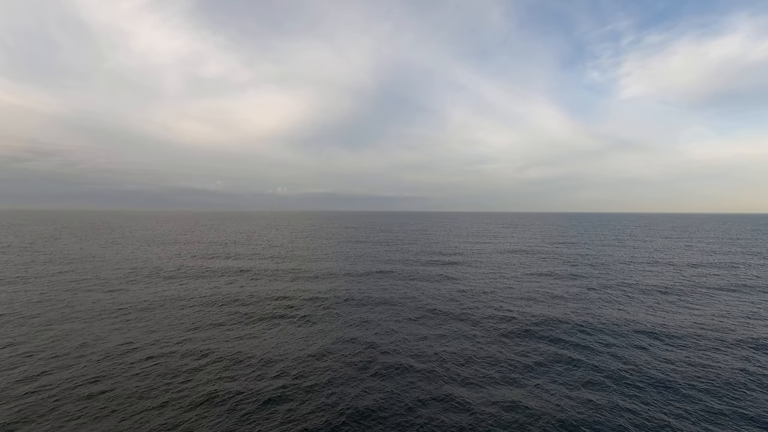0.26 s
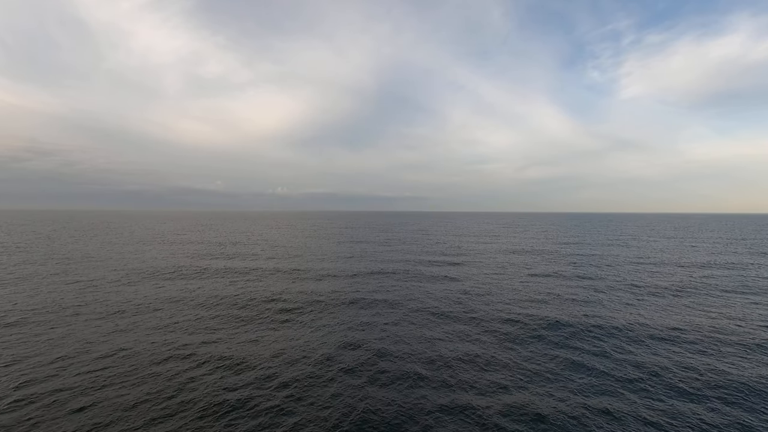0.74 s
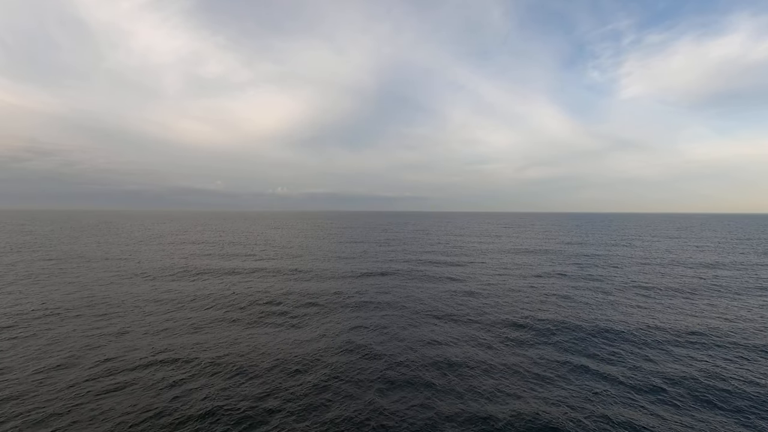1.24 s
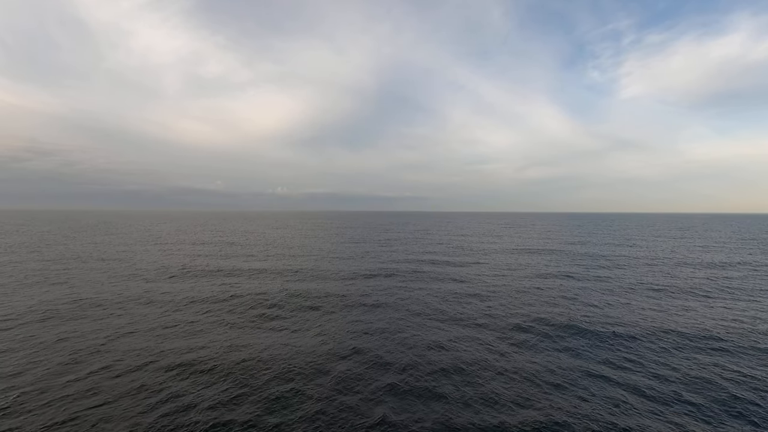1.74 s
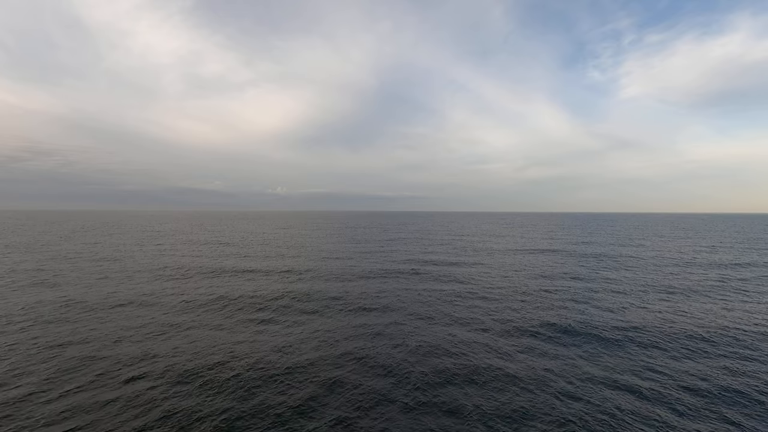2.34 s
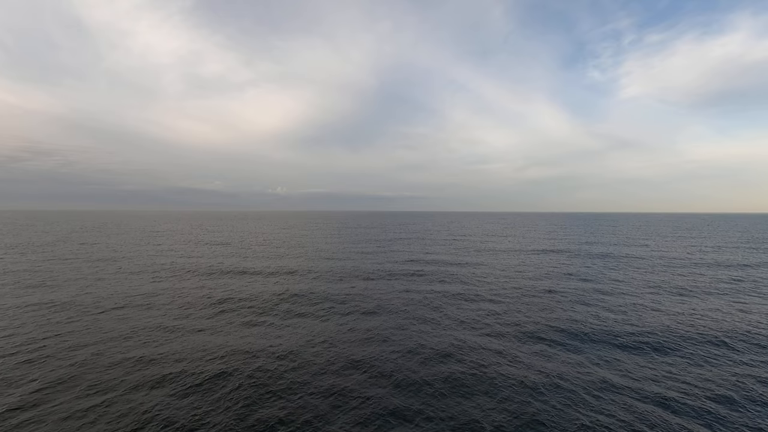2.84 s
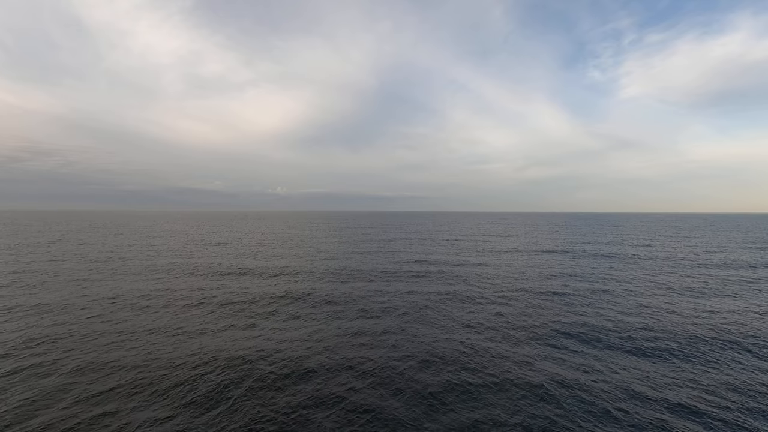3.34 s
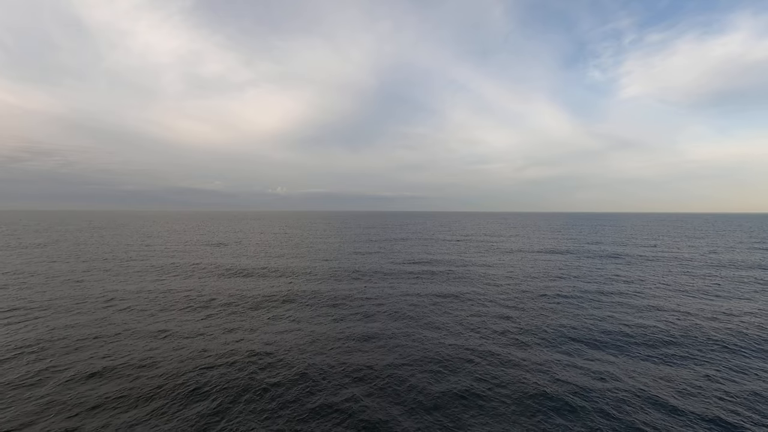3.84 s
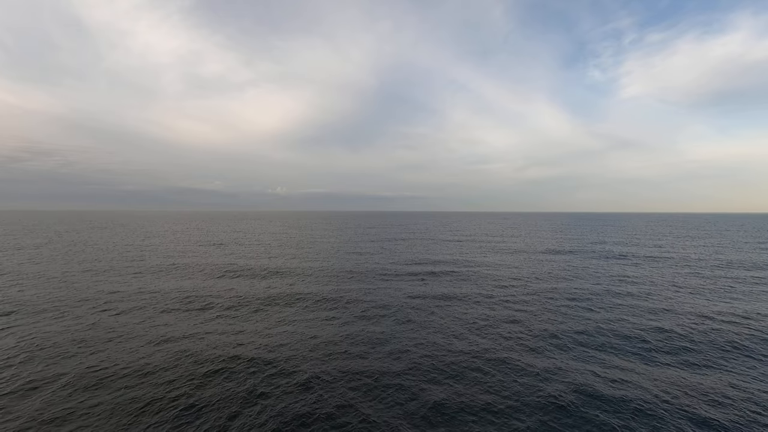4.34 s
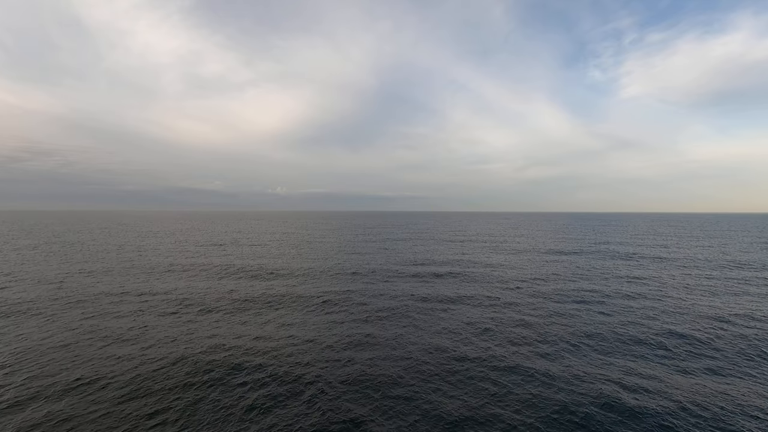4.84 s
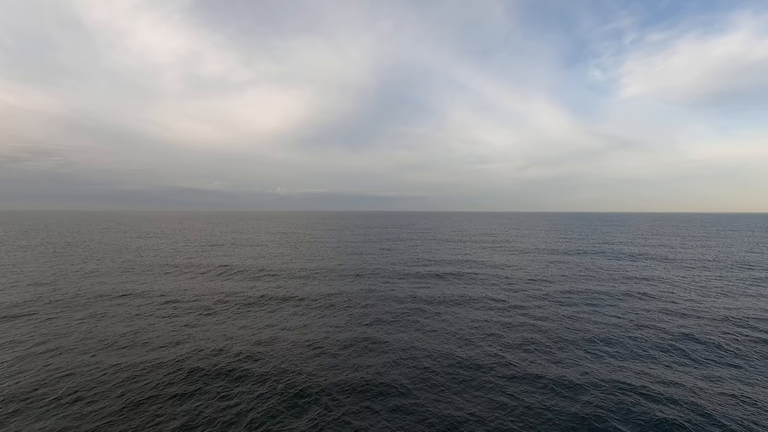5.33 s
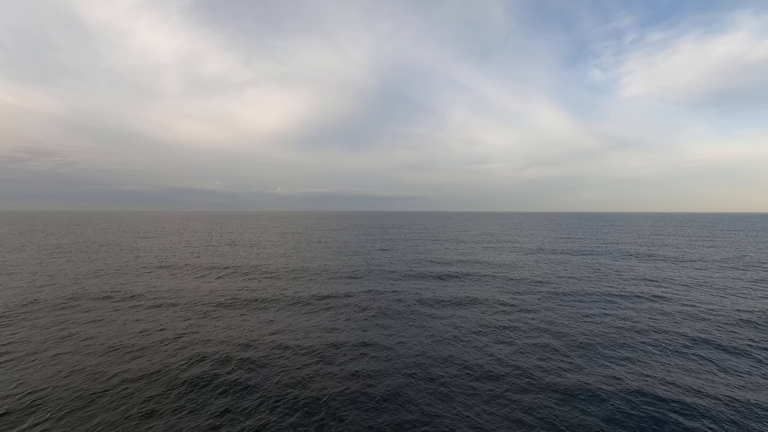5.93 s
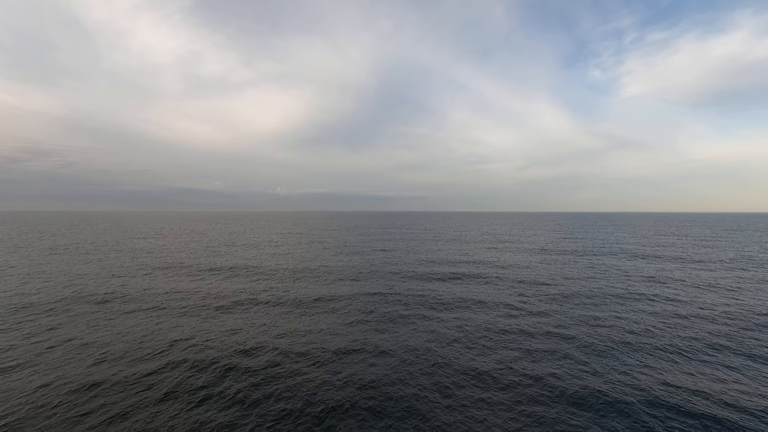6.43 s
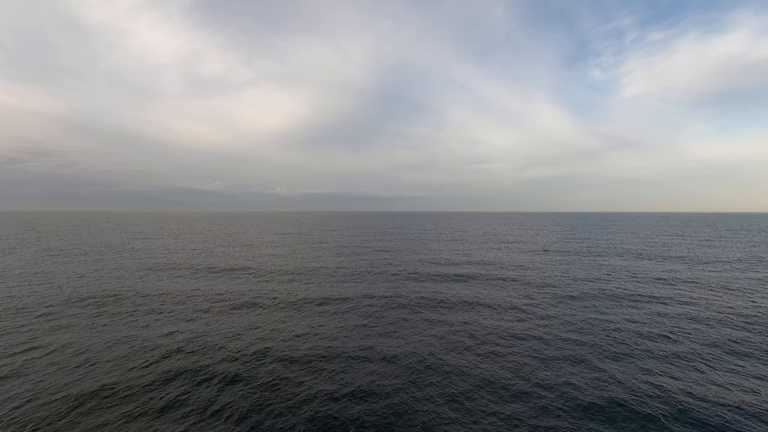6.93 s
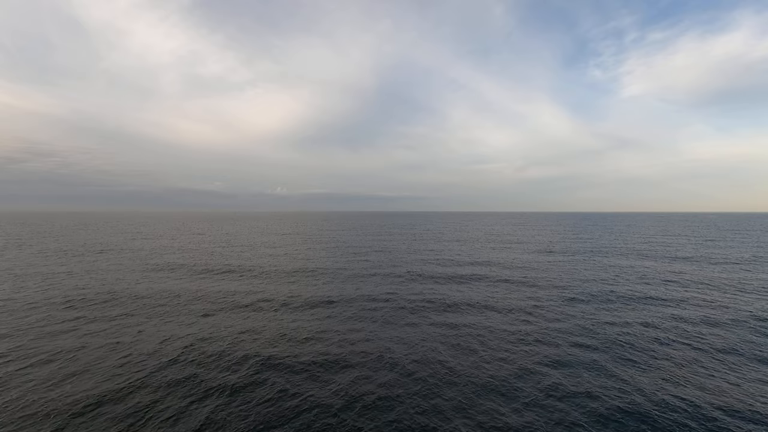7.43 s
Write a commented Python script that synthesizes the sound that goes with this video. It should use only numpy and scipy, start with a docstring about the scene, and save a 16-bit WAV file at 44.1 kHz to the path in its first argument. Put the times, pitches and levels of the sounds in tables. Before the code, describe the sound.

A constant low rush of wind hits an exposed microphone at sea, fluttering and rasping from the start. Single deep thumps land here and there, and after a second or so brief gusts add hollow roars. The wash of waves against the ship stays much quieter, a soft foamy hiss rising and falling behind the wind.

```python
"""Open sea from the deck of a moving ship, steady wind on the microphone.
Throughout, large eddies rumble on the housing, smaller ones buffet it and the flow rasps at the port;
beneath the wind, the wash along the hull swells and sinks. From the first moments flurries flap and
tear at the port and single eddies thump the housing. From 1.4 s short gusts add hollow roars.
A limiter holds the peaks."""
import sys
import numpy as np
from scipy import signal
from scipy.fft import rfft, irfft, next_fast_len
from scipy.io import wavfile
from scipy.ndimage import uniform_filter1d, minimum_filter1d

SR = 44100
rng = np.random.default_rng(int(sys.argv[2]) if len(sys.argv) > 2 else 0)


def transcribe(signal):
    """Save signal, clipped to [-1, 1], as a 16-bit WAV file at the path in sys.argv[1]."""
    frames = np.atleast_2d(signal).T
    limited = np.clip(frames, -1, 1)
    pcm = np.round(limited * 32767).astype(np.int16)
    wavfile.write(sys.argv[1], SR, pcm)


N = 338584
TIME = np.arange(N) / SR


def from_db(db):
    """Decibels to gain."""
    return 10 ** (np.asarray(db) / 20)


def unit_rms(x):
    """Scale to rms 1."""
    return x / np.sqrt(np.mean(x ** 2) + 1e-20)


def curve(rows):
    """(t/s, value) rows, joined linearly at each sample."""
    return np.interp(TIME, *np.transpose(rows))


def drift(corner_hz):
    """Slow random signal, rms about 1: noise through two one-pole low-passes."""
    hop, run_in = 40, 2000
    pole = np.exp(-2 * np.pi * corner_hz * hop / SR)
    white = rng.standard_normal(N // hop + run_in + 2)
    slow = signal.lfilter([1], [1, -2 * pole, pole * pole], white)[run_in:]
    return np.interp(np.arange(N) / hop, np.arange(len(slow)), unit_rms(slow))


def coloured_noise(spectrum):
    """Noise shaped by (f/Hz, level/dB) rows; rms 1."""
    size = next_fast_len(N)
    f_hz, level_db = np.transpose(spectrum)
    bins_hz = np.maximum(np.arange(size // 2 + 1) * SR / size, 1)
    gain = from_db(np.interp(np.log(bins_hz), np.log(f_hz), level_db))
    gain *= np.minimum(bins_hz / f_hz[0], 1) * np.minimum(f_hz[-1] / bins_hz, 1) ** 2   # end roll-offs
    return unit_rms(irfft(gain * rfft(rng.standard_normal(size)), size)[:N])


def grainy_noise(spectrum, grain_db):
    """Coloured noise broken into millisecond grains; rms 1."""
    return unit_rms(coloured_noise(spectrum) * from_db(grain_db * np.tanh(drift(250))))


def steady(x, span_s):
    """Divide by the running rms: fast lumps stay, slow swells go."""
    power = uniform_filter1d(x ** 2, max(int(span_s * SR), 2))
    return x / np.sqrt(np.maximum(power, 1e-12))


def puff(t_s, peak_db, sigma_s):
    """Gaussian pressure envelope of one passing eddy."""
    return from_db(peak_db) * np.exp(-0.5 * ((TIME - t_s) / sigma_s) ** 2)


def rumble(trim_db, lumpy_db):
    """Large eddies press slowly on the housing."""
    # eddy pressure: t/s, level/dB before trim
    pressure = [(0, -21), (0.3, -19.5), (0.6, -21.5), (1.3, -21), (2.5, -23), (3.05, -20), (4.25, -21.5),
                (4.6, -21), (5.25, -21.5), (6.25, -20), (6.65, -20), (7.68, -22)]
    # rumble spectrum: f/Hz, level/dB
    spectrum = [(10, -7.5), (22, 1), (45, 0), (58, -0.5), (75, -4.5), (118, -8), (160, -13), (260, -30.5),
                (600, -66)]
    noise = coloured_noise(spectrum) * from_db(lumpy_db * drift(4.4))
    return from_db(curve(pressure) + trim_db) * steady(noise, span_s=0.11)


def buffeting(eddies, trim_db, lumpy_db, hollow_db):
    """Smaller eddies beat on the housing; the harder the push, the hollower the sound."""
    # wind push in slow gusts: t/s, level/dB before trim
    push = [(0, -26), (0.7, -27), (1.05, -24), (1.55, -23), (1.75, -28.5), (2.5, -27.5), (3.6, -27),
            (4.3, -22), (4.85, -25), (5.1, -24.5), (5.9, -26.5), (6.5, -25), (7.3, -26.5), (7.68, -25.5)]
    # low-mid strength: t/s, level/dB
    low_mid_level = [(0, -41.5), (0.4, -34), (0.95, -36.5), (1.35, -34), (1.7, -34), (2.2, -36), (2.6, -39),
                     (3.0, -36), (3.9, -32.5), (5.1, -34.5), (6.3, -31.5), (7.3, -36), (7.68, -33)]
    # spectra of the three bands: f/Hz, level/dB
    beat_spectrum = [(60, -23), (120, 0), (170, 0.5), (225, 1.5), (285, -2), (380, -5.5), (480, -16),
                     (660, -23), (1000, -32), (2000, -47.5), (4000, -78)]
    hollow_spectrum = [(130, -18.5), (200, -5.5), (260, -1), (305, -1), (360, -10.5), (460, -22),
                       (800, -33.5)]
    low_mid_spectrum = [(280, -18.5), (400, 1.5), (490, 1), (660, -7.5), (1000, -17), (2000, -44.5)]
    push_db = curve(push) + trim_db
    swell_db = push_db - np.mean(push_db)
    lumps = from_db(lumpy_db * eddies)
    beat = steady(coloured_noise(beat_spectrum) * lumps, span_s=0.68)
    hollow = steady(coloured_noise(hollow_spectrum) * lumps, span_s=0.14)
    low_mids = steady(coloured_noise(low_mid_spectrum) * lumps, span_s=0.15)
    return (from_db(push_db - 0.4 * swell_db) * beat
            + from_db(push_db + hollow_db + 0.75 * swell_db) * hollow
            + from_db(curve(low_mid_level)) * low_mids)


def rasp(eddies, trim_db, flutter_db, grain_db, edge_db):
    """The flow flutters at the port with a grainy rasp."""
    # flow across the port: t/s, level/dB before trim
    flow = [(0, -47.5), (0.95, -42.5), (1.3, -43), (1.75, -35.5), (2.3, -38.5), (2.8, -36.5), (3.6, -34),
            (4.1, -41), (4.6, -40.5), (5.4, -38), (6.1, -36.2), (6.65, -34.5), (7.0, -35.5), (7.3, -36),
            (7.55, -42), (7.68, -34)]
    # spectra of the rasp and its brighter edge: f/Hz, level/dB
    body_spectrum = [(250, -17.5), (500, 1.5), (900, 0.5), (1300, -3), (1750, -5.5), (2100, -11),
                     (2600, -21.5), (3500, -22.5), (6000, -56.5)]
    edge_spectrum = [(400, -11.5), (800, 5.5), (1300, 2.5), (1700, 1.5), (2200, -5), (2700, -9.5),
                     (3500, -28), (6000, -44.5)]
    flutter = from_db(flutter_db * np.tanh(0.55 * eddies + 0.45 * drift(35)))
    body = steady(flutter * grainy_noise(body_spectrum, grain_db), span_s=0.091)
    edge = steady(flutter * grainy_noise(edge_spectrum, grain_db), span_s=0.13)
    return from_db(curve(flow) + trim_db) * (body + from_db(edge_db) * edge)


def wash(tumble_db, foam_trim_db, churn_db):
    """Water tumbles off the hull with a dull rush; bursting bubbles merge into a hiss."""
    # foam swelling with each wave: t/s, level/dB before trim
    waves = [(0, -55), (0.7, -56.5), (1.1, -56), (1.75, -54), (2.4, -57), (3.1, -54), (3.6, -54),
             (4.05, -54.5), (4.4, -52.5), (5.0, -56.5), (5.55, -55), (5.9, -52.5), (6.35, -52.5),
             (6.55, -54), (6.85, -54), (7.25, -55.5), (7.68, -55)]
    # spectra of water and foam: f/Hz, level/dB
    tumble_spectrum = [(150, 1), (450, 5), (700, 0), (950, -1.5), (1300, -5.5), (1800, -13.5), (2600, -25),
                       (4000, -40.5)]
    foam_spectrum = [(500, -1), (1500, -0.5), (2500, 0), (3500, 2.5), (5000, -0.5), (6300, -7),
                     (7600, -12.5), (9000, -21.5), (10200, -26), (11200, -40.5), (13000, -42)]
    foam_db = curve(waves)
    swell_db = foam_db - np.mean(foam_db)
    tumble = from_db(tumble_db + 2.3 * swell_db) * coloured_noise(tumble_spectrum)
    foam = from_db(foam_db + foam_trim_db) * coloured_noise(foam_spectrum)
    return from_db(churn_db * drift(12)) * (tumble + foam)


def flurries(grain_db):
    """Flurries flap at the port; where the flow tears, it crackles higher up."""
    # single flurries: t/s, flap level/dB, tear level/dB, sigma/s
    events = [(0.047, -39, -62, 0.028), (0.195, -36, -54, 0.005), (0.301, -33.5, -43.5, 0.011),
              (0.367, -36, -46, 0.0079), (0.477, -37.5, -44, 0.058), (0.602, -36.5, -45, 0.014),
              (0.698, -32, -48, 0.0051), (0.734, -39, -46, 0.018), (0.791, -36.5, -44.5, 0.025),
              (0.956, -38, -42, 0.0023), (1.11, -36, -52, .004), (1.322, -38, -43, 0.0072),
              (1.348, -36, -45, 0.0085), (1.38, -35, -57, 0.0047), (1.48, -36, -45, 0.0037),
              (1.535, -34, -45, 0.0049), (1.638, -29, -52, 0.004), (2.113, -33, -50, .006),
              (2.27, -36, -45, 0.0048), (2.415, -31, -48, 0.0036), (2.755, -33, -41, 0.0049),
              (2.89, -37, -42, 0.0045), (3.173, -33, -46, 0.0044), (3.268, -36, -41, 0.0054),
              (3.433, -33, -46, .005), (3.759, -33.5, -44, 0.03), (3.949, -34, -50, .004),
              (3.97, -30.5, -42, 0.0045), (4, -35, -55, .005), (4.384, -33.5, -43.5, 0.031),
              (4.452, -30.5, -47, 0.0039), (4.719, -44, -40, 0.004), (4.836, -32, -42, 0.0032),
              (5.052, -33, -45, 0.0081), (5.127, -37, -47, 0.012), (5.219, -36, -42, .007),
              (5.253, -35.5, -47, 0.01), (5.342, -38, -49, 0.011), (5.44, -36.5, -44, 0.0086),
              (5.532, -31.5, -49, .004), (5.753, -31, -44, 0.0074), (5.977, -30.5, -47, .005),
              (6.234, -33, -40, .004), (6.3, -39, -36.5, 0.0084), (6.43, -33, -44, 0.0097),
              (6.504, -36, -42, 0.012), (6.594, -39, -41, 0.007), (6.675, -33, -47, .016),
              (6.738, -33, -35.5, 0.0056), (6.86, -35, -43, .011), (6.916, -32.5, -46, .01),
              (6.982, -32.5, -43, 0.0092), (7.092, -34, -32, 0.0031), (7.22, -34, -36.5, 0.0085),
              (7.329, -35, -40, 0.0045), (7.443, -30.5, -46, 0.014)]
    # flap and tear spectra: f/Hz, level/dB
    flap_spectrum = [(350, -11), (750, 3.5), (1200, 1), (1750, -3), (2200, -13.5), (3000, -28), (5000, -49)]
    tear_spectrum = [(1000, -10), (1900, 3.5), (2300, -0.5), (2800, -5.5), (3400, -15.5), (4200, -23),
                     (6500, -43)]
    flap = sum(puff(t_s, db, sigma_s) for t_s, db, _, sigma_s in events)
    tear = sum(puff(t_s, db, sigma_s) for t_s, _, db, sigma_s in events)
    flap *= steady(grainy_noise(flap_spectrum, grain_db), span_s=0.0079)
    tear *= steady(grainy_noise(tear_spectrum, grain_db), span_s=0.0097)
    return flap + tear


def thumps():
    """Single eddies hit the housing with a deep thump; hard ones also knock."""
    # eddy hits: t/s, thump level/dB, knock level/dB, sigma/s
    hits = [(0.191, -18.5, -22.5, 0.0071), (0.346, -18, -32, 0.016), (1.314, -17.5, -25.5, 0.017),
            (1.834, -14, -24, 0.012), (2.194, -15, -17.5, 0.0062), (2.248, -17.5, -34, 0.005),
            (2.276, -17, -30, 0.0058), (3.852, -24, -25.5, 0.02), (4.45, -17, -20, 0.0058),
            (4.717, -14, -22, 0.0055), (4.838, -12, -23, 0.012), (6.596, -20, -26, 0.0045),
            (7.089, -11.5, -20, 0.0057), (7.109, -13, -34, 0.0039)]
    # thump and knock spectra: f/Hz, level/dB
    thump_spectrum = [(30, -18), (70, 2.5), (110, -0.5), (160, -9.5), (260, -12.5), (500, -33.5),
                      (1000, -65)]
    knock_spectrum = [(120, -15), (220, 0), (380, 2.5), (520, -6), (750, -16.5), (1500, -52)]
    thump = sum(puff(t_s, db, sigma_s) for t_s, db, _, sigma_s in hits)
    knock = sum(puff(t_s, db, sigma_s) for t_s, _, db, sigma_s in hits)
    thump *= steady(coloured_noise(thump_spectrum), span_s=0.014)
    knock *= steady(coloured_noise(knock_spectrum), span_s=0.006)
    return thump + knock


def roars():
    """Short gusts make the housing roar, each at its own pitch."""
    # gusts: t/s, level/dB, f/Hz, sigma/s
    gusts = [(1.38, -27, 300, 0.032), (1.58, -24.5, 273, 0.049), (2.173, -24, 260, 0.026),
             (3.804, -23, 265, 0.04), (4.06, -30.5, 345, 0.049), (4.435, -28, 320, 0.032),
             (5.33, -35, 387, 0.087), (6.55, -25.5, 282, 0.065), (7.072, -25, 290, 0.027)]
    # roar band: ratio to pitch, level/dB
    band = [(0.5, -31.5), (0.8, -2), (1, 4), (1.25, -6), (2, -35.5)]
    sound = np.zeros(N)
    for t_s, peak_db, pitch_hz, sigma_s in gusts:
        noise = coloured_noise([(pitch_hz * ratio, db) for ratio, db in band])
        sound += puff(t_s, peak_db, sigma_s) * steady(noise, span_s=0.03)
    return sound


def limiter(x, ceiling_db, release_db_per_s, attack_s):
    """Gain ducks just ahead of each peak, then recovers."""
    span = max(int(attack_s * SR), 2)
    over_db = np.maximum(20 * np.log10(np.abs(x) + 1e-9) - ceiling_db, 0)
    ramp_db = release_db_per_s * TIME
    cut_db = np.maximum.accumulate(over_db + ramp_db) - ramp_db
    return x * from_db(uniform_filter1d(minimum_filter1d(-cut_db, span), span))


def scene():
    """Wind over the wash, mono; the same eddies drive buffeting and rasp."""
    eddies = drift(corner_hz=20.5)
    mix = rumble(trim_db=0.56, lumpy_db=-0.5)
    mix += buffeting(eddies, trim_db=-1.5, lumpy_db=1.37, hollow_db=-4.5)
    mix += rasp(eddies, trim_db=-0.2, flutter_db=2.0, grain_db=7.5, edge_db=-8.5)
    mix += wash(tumble_db=-41.5, foam_trim_db=3.0, churn_db=0.5)
    mix += flurries(grain_db=8.0) + thumps() + roars()
    return mix[None]


def record(dry):
    """Limiter, then a steep low-pass."""
    stop_db, stop_hz = 70, 13500
    limited = limiter(dry[0], ceiling_db=-7.4, release_db_per_s=150, attack_s=0.002)
    low_pass = signal.cheby2(12, stop_db, stop_hz, fs=SR, output="sos")
    return signal.sosfilt(low_pass, limited)[None]


dry = scene()
out = record(dry)
transcribe(out)
```